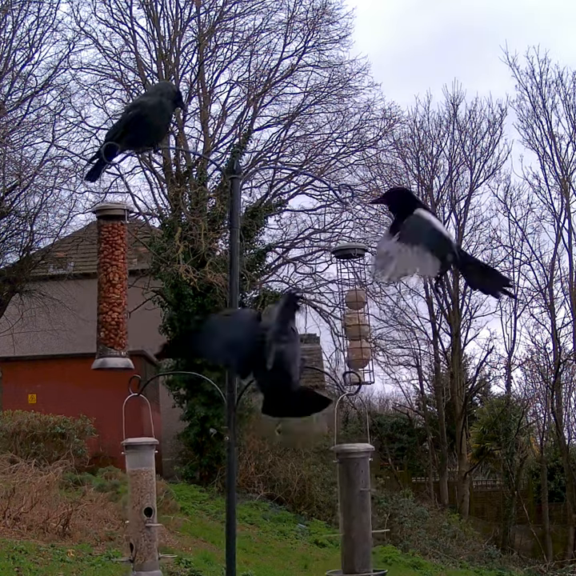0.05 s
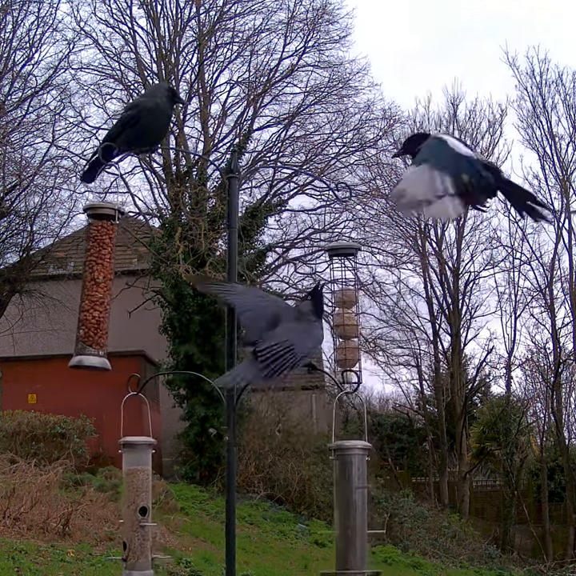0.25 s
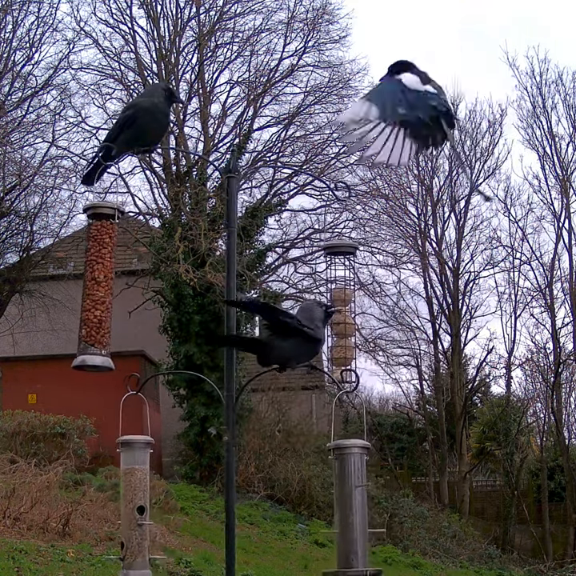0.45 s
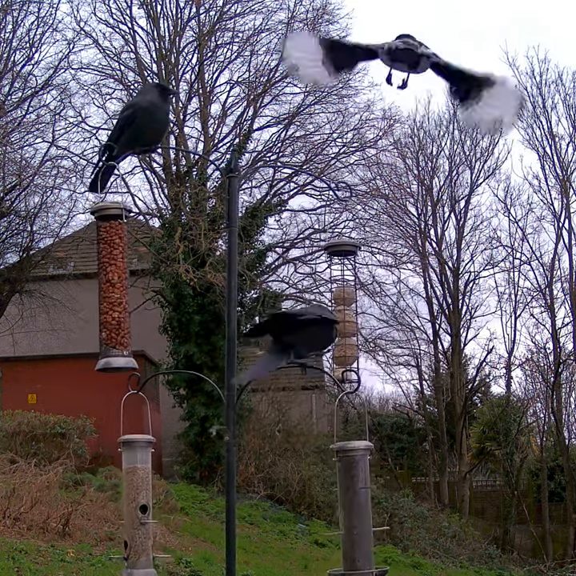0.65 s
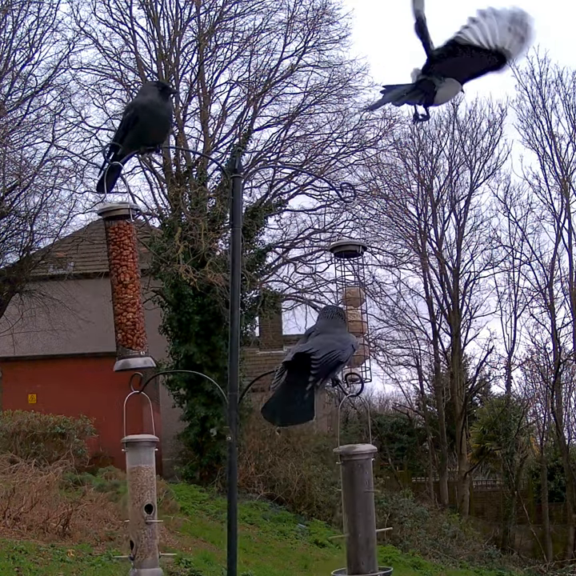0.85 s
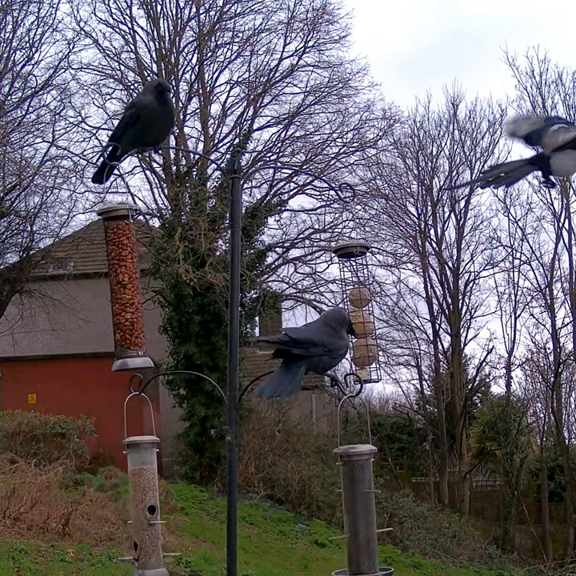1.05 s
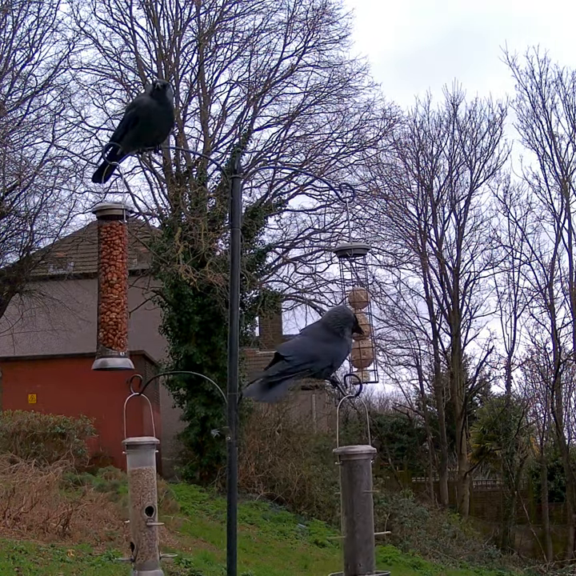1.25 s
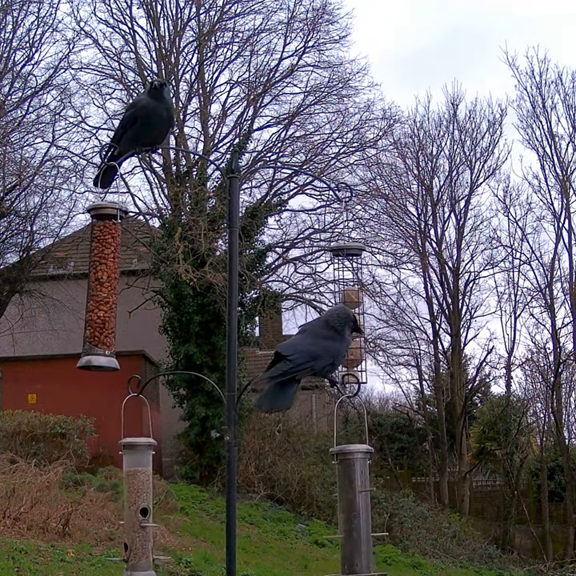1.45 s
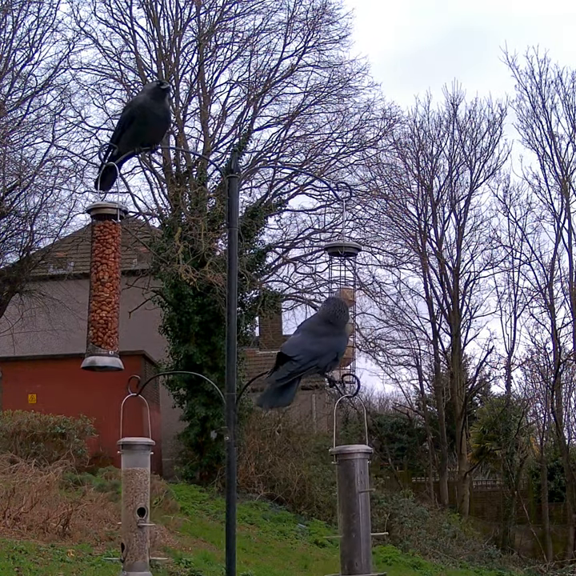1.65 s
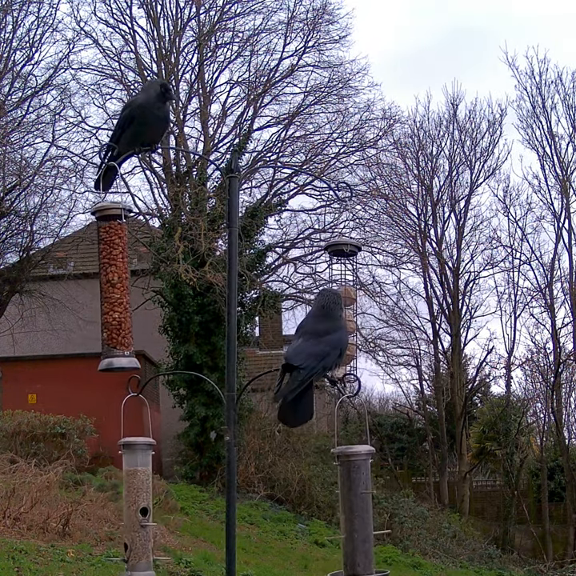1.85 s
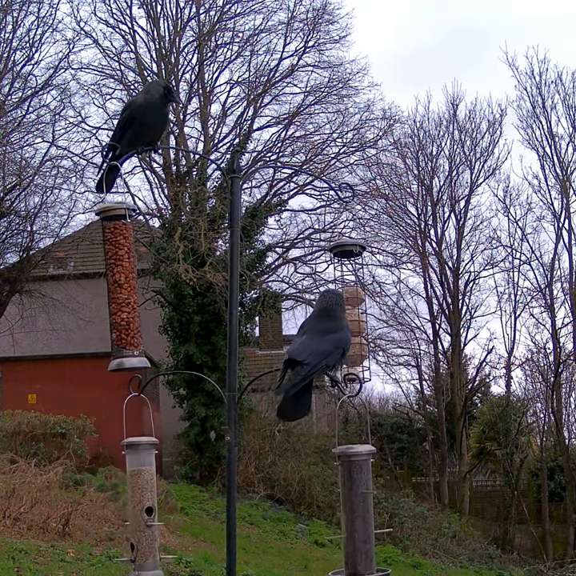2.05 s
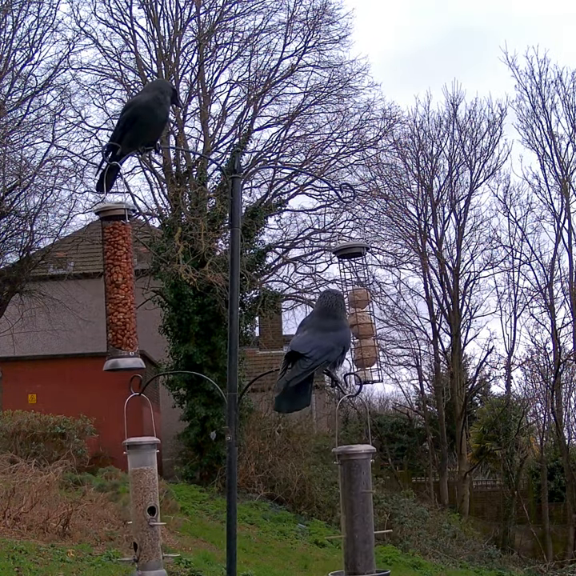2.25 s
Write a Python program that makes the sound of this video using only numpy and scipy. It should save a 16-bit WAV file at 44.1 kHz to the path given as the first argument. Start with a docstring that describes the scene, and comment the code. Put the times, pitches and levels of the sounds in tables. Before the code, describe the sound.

A jackdaw gives one sharp chack, then another half a second later; feather swishes, flaps and tiny snaps follow and fade, over soft distant traffic, leaf hiss and wind nudging a small outdoor camera microphone.

```python
"""Jackdaws at the garden feeder

Two sharp falling jackdaw calls, built from gliding harmonics, come back off nearby walls and the garden.
Shaped noise makes wing swishes, flaps, snaps, low body under the calls and two narrow resonances; gliding
sines make small songbirds trilling and peeping further off. Coloured noise gives far traffic hum, leaf hiss
and wind nudging the microphone of a small camera that samples at 16 kHz and loses its treble around sudden
loud sounds.
"""
import sys
import numpy as np
from scipy import signal
from scipy.fft import rfft, irfft, next_fast_len
from scipy.io import wavfile
from scipy.ndimage import uniform_filter1d, map_coordinates

SR = 44100
rng = np.random.default_rng(int(sys.argv[2]) if len(sys.argv) > 2 else 0)


def file_out(sig):
    """Save sig as 16-bit WAV at sys.argv[1]."""
    # one column per channel
    cols = np.atleast_2d(sig).T
    # limit, then scale
    lim = np.clip(cols, -1, 1)
    pcm = np.round(lim * 32767).astype(np.int16)
    wavfile.write(sys.argv[1], SR, pcm)


def volts(x):
    """Linear amplitude factor 10**(x/20) for a level x in dB, scalar or array-like."""
    e = np.asarray(x, float) / 20
    return 10 ** e


N = 101429  # length in samples, 2.3 s


def unit(x):
    """Scale to rms 1."""
    return x / np.sqrt(np.mean(x ** 2) + 1e-20)


def along(points, hz):
    """Read a curve of (Hz, value) points on a log frequency axis."""
    point_hz, value = np.transpose(points)
    return np.interp(np.log(hz + 1), np.log(point_hz + 1), value)


def curves(rows):
    """One automation curve, a value per sample, for each column after the time."""
    time_s, *columns = np.transpose(rows)
    return [np.interp(np.arange(N) / SR, time_s, column) for column in columns]


def wobble(rate):
    """A smooth random curve with rate knots a second, 399 at most."""
    knots = rng.standard_normal(int(N * 400 / SR) + 4)
    return map_coordinates(knots, [np.arange(N) * min(rate, 399) / SR])


def filtered(x, response):
    """Filter x by a gain that is a function of frequency in Hz."""
    size = next_fast_len(N + 8192)
    gain = response(np.fft.rfftfreq(size, 1 / SR))
    return irfft(rfft(x, size) * gain, size)[:N]


def rush(spectrum, patchy_db):
    """Coloured noise of rms 1 whose gain varies in random patches of time and pitch."""
    cells = signal.stft(rng.standard_normal(N), nperseg=512)[2]
    patches = uniform_filter1d(rng.standard_normal(cells.shape), 5, 0)
    patches = uniform_filter1d(patches, 6, 1)
    noise = signal.istft(cells * volts(patchy_db * unit(patches)), nperseg=512)[1][:N]
    return unit(filtered(noise, lambda f: volts(along(spectrum, f))))


def closed(points):
    """Fade a spectrum to -90 dB beyond both ends."""
    return [(points[0][0] / 2, -90)] + list(points) + [(points[-1][0] * 1.15, -90)]


def puffs(rows, spectrum, patchy_db, flicker_db):
    """Noise puffs with soft bell-shaped envelopes and a ragged surface."""
    t = np.arange(N) / SR
    power = sum(volts(2 * db) * np.exp(-((t - centre) / width) ** 2) for centre, width, db in rows)
    return np.sqrt(power) * volts(flicker_db * wobble(200)) * rush(closed(spectrum), patchy_db)


# decay of the garden's scatter: freq_hz, t60_s
GARDEN_DECAY = [(500, .22), (2000, .25), (8000, .2)]


def garden(x):
    """Diffuse scatter from trees and houses: decaying noise of unit energy, convolved with the sound."""
    hz, t, cells = signal.stft(rng.standard_normal(SR // 2), SR, nperseg=256)
    decay_db = -60 * t / along(GARDEN_DECAY, hz)[:, None]
    tail = signal.istft(cells * volts(decay_db), SR, nperseg=256)[1]
    late = np.pad(x, (300, 0))  # pre-delay, samples
    return signal.fftconvolve(late, tail / np.linalg.norm(tail))[:N]


# levels of the garden air: time_s, hum_db, hiss_db, wind_db
AIR_LEVELS = [(0.0, -65, -70.5, -54.5), (0.15, -66, -76, -58.5), (0.29, -55.5, -63, -51.5),
              (0.38, -61.5, -75.5, -56.5), (0.56, -63.5, -70.5, -58.5), (0.79, -58.5, -69, -53.5),
              (0.93, -58.5, -71.5, -58.5), (1.09, -58, -69.5, -51.5), (1.23, -58.5, -69.5, -50.5),
              (1.47, -62.5, -71.5, -57.5), (1.96, -64.5, -77.5, -58), (2.3, -65.5, -75.5, -60)]
# far traffic hum, spectral density: freq_hz, density_db
HUM_SPECTRUM = [(76, -39), (130, -11.5), (217, -4), (320, -11), (362, -8), (377, -14.5), (502, -12.5),
                (668, -8.5), (966, -11.5), (1500, -31), (1950, -28), (3300, -120)]
# leaf hiss, spectral density: freq_hz, density_db
HISS_SPECTRUM = [(760, -5), (1300, -13.5), (1720, -5.5), (1950, -12), (2580, -4.5), (2800, -12.5),
                 (3730, -8.5), (5260, -9), (6690, -4.5), (7790, -11.5), (8780, -30), (11400, -56),
                 (19300, -120)]
# wind on the microphone, spectral density: freq_hz, density_db
WIND_SPECTRUM = [(8.8, -15), (15, -0.5), (65, -1.5), (100, -8.5), (124, -14), (150, -38.5), (200, -55),
                 (330, -120)]


def air():
    """Traffic hum, leaf hiss and lumpy wind: three coloured noises, each riding its own level curve."""
    hum_db, hiss_db, wind_db = curves(AIR_LEVELS)
    hum = volts(hum_db + 1.23 * wobble(13.76)) * rush(HUM_SPECTRUM, patchy_db=2.0)
    hiss = volts(hiss_db + 0.44 * wobble(22)) * rush(HISS_SPECTRUM, patchy_db=2.0)
    wind = volts(wind_db + 1.5 * wobble(8.85)) * rush(WIND_SPECTRUM, patchy_db=1.3)
    return hum + hiss + wind


# level of the sustained ring: time_s, level_db
RING_LEVEL = [(0.0, -78.5), (0.76, -97.5), (0.93, -69.5), (1.11, -80), (2.03, -85.5), (2.3, -106)]
# bursts of the same ring: centre_s, width_s, level_db
RING_BURSTS = [(.075, 0.014, -73), (.545, 0.021, -72), (.574, 0.0091, -57.5), (.797, 0.0028, -55),
               (.83, 0.01, -66), (.875, 0.018, -58), (.915, 0.019, -64), (.992, .006, -65),
               (1.02, .02, -67), (1.12, 0.013, -64.5), (1.975, .004, -73.5)]
# spectrum of the bursts: freq_hz, density_db
RING_SPECTRUM = [(3400, -22), (3700, -4.5), (3800, 8.5), (3950, -4.5), (4250, -30)]


def narrow_ring():
    """A narrow noise band near 3.8 kHz, sustained with a flickering level and stirred into short bursts."""
    centre_hz, width_hz, flicker_db = 3800, 180, 3.5
    noise = rng.standard_normal(N)
    band = unit(filtered(noise, lambda f: 1 / (1 + ((f - centre_hz) / width_hz) ** 4)))
    sustained = volts(curves(RING_LEVEL)[0] + flicker_db * wobble(59.45)) * band
    return sustained + puffs(RING_BURSTS, RING_SPECTRUM, patchy_db=-0.5, flicker_db=3.0)


# trills: start_s, length_s, pitch_top_time_s, level_db, swell_db_per_s, top_pitch_hz, top_climb_hz_per_s,
# low_pitch_hz, sweeps_per_s
TRILL_NOTES = [(-.02, .058, .006, -52, -60, 3850, 0, 2600, 47),
               (-.02, .058, .0175, -53, -120, 2950, 0, 2180, 50),
               (2.226, .1, 2.2845, -59, 170, 3600, 3500, 2470, 64.5)]
# peeps: start_s, length_s, from_hz, to_hz, level_db
PEEP_NOTES = [(1.385, .07, 7950, 7350, -64), (1.545, .065, 7550, 6900, -73), (1.59, .025, 6300, 5700, -74),
              (1.875, .03, 6300, 5800, -76), (.432, .026, 3250, 2800, -69)]


def songbirds():
    """A whistle flung up and down, lingering low, a little unsteady; thin sliding peeps; garden scatter."""
    point, wet_db = 1.7, -9  # a higher point makes the pitch tops narrower
    t, out = np.arange(N) / SR, np.zeros(N)
    for start, length, top, db, swell, high_hz, climb, low_hz, rate in TRILL_NOTES:
        age = np.clip(t - start, 0, length)
        lift = np.abs(np.cos(np.pi * rate * (t - top))) ** (2 * point)  # 0 low, 1 at a pitch top
        low = low_hz + .3 * climb * (age - length / 2)
        pitch = low + (high_hz + climb * age - low) * lift + 60 * wobble(150)
        fade = np.clip(np.minimum(t - start, start + length - t) / 0.013, 0, 1)
        # weaker mid-sweep, stronger at the tops, but less so before the timed top
        weak_db = 28 * lift * (1 - lift) - 3 * lift + 480 * lift * np.clip(top - t, 0, 1)
        level_db = db + swell * age - weak_db + 2.2 * wobble(200)
        out += fade * volts(level_db) * np.sin(2 * np.pi * np.cumsum(pitch) / SR)
    for start, length, from_hz, to_hz, db in PEEP_NOTES:
        u = np.clip((t - start) / length, 0, 1)
        pitch = from_hz + (to_hz - from_hz) * u + 40 * wobble(170)
        env = volts(db + 2.5 * wobble(90)) * np.sin(np.pi * u)
        out += env * np.sin(2 * np.pi * np.cumsum(pitch) / SR)
    return out + volts(wet_db) * garden(out)


# short broad feather snaps: centre_s, width_s, level_db
SNAP_TIMES = [(.58, .003, -67), (.95, .004, -64), (1.113, .007, -69), (1.228, .005, -74),
              (1.255, .005, -67), (1.362, .005, -67), (1.475, .008, -73), (1.595, .006, -74),
              (1.82, .006, -78)]
# snap spectrum: freq_hz, density_db
SNAP_SPECTRUM = [(2000, -7), (3500, -19.5), (5000, -2.5), (6800, 2.5), (7800, 3.5), (8600, -16.5)]


def feather_snaps():
    """Feather snaps: very short broadband noise puffs with a strongly flickering level."""
    return puffs(SNAP_TIMES, SNAP_SPECTRUM, patchy_db=1, flicker_db=6)


# brief narrow bursts of a microphone resonance: centre_s, width_s, level_db
RESONANCE_BURSTS = [(.143, 0.0062, -63), (.381, 0.007, -64), (.505, .004, -52), (.573, 0.01, -64.5),
                    (.8115, .002, -55), (.823, .003, -62), (.893, 0.0089, -56.5), (.943, 0.0036, -61),
                    (1.008, 0.0062, -62), (1.038, 0.012, -61), (1.143, 0.0053, -71)]
# spectrum of the resonance: freq_hz, density_db
RESONANCE_SPECTRUM = [(5300, -36), (5750, -7), (6050, -2), (6400, -11.5), (6900, -24)]


def microphone_resonance():
    """Brief narrow noise bursts near 6 kHz, a microphone resonance stirred by the wings."""
    return puffs(RESONANCE_BURSTS, RESONANCE_SPECTRUM, patchy_db=-2.0, flicker_db=3.0)


# dull low puffs, wing flaps and low body under the two calls: centre_s, width_s, level_db
LOW_PUFF_TIMES = [(.165, 0.017, -67), (.275, 0.005, -63.5), (.765, 0.023, -49.5), (.46, 0.039, -65),
                  (.815, 0.016, -51), (.915, 0.024, -54.5), (1.015, 0.022, -58), (1.11, 0.0087, -53),
                  (1.22, 0.0085, -89), (1.33, 0.037, -71), (1.41, 0.012, -64.5)]
# spectrum of the low puffs: freq_hz, density_db
LOW_PUFF_SPECTRUM = [(120, -21), (250, -3), (450, -1.5), (700, 5), (1000, 4), (1300, -23), (2500, -15),
                     (4000, -26.5)]


def flaps_and_call_body():
    """Dull low noise puffs, strongest below about 1 kHz: wing flaps, and low body under the two calls."""
    return puffs(LOW_PUFF_TIMES, LOW_PUFF_SPECTRUM, patchy_db=-1.0, flicker_db=3.0)


# feather swishes: centre_s, width_s, level_db
SWISH_TIMES = [(.38, 0.014, -72.5), (.51, 0.015, -51.5), (.812, 0.018, -55.5), (.845, 0.024, -60),
               (.893, 0.035, -60.5), (.947, 0.013, -56.5), (1.01, 0.017, -59), (1.042, 0.018, -56),
               (1.145, .014, -53.5)]
# swish spectrum: freq_hz, density_db
FEATHER_SPECTRUM = [(1200, -39), (2500, -23), (3800, -16), (4800, -11.5), (5500, -14), (6000, -0.5),
                    (6500, -12), (7000, -3), (7800, -14), (8600, 9)]


def feather_swishes():
    """Feather swishes: bright turbulent noise puffs, as birds shuffle places."""
    return puffs(SWISH_TIMES, FEATHER_SPECTRUM, patchy_db=3, flicker_db=2.5)


# jackdaw calls: start_s, length_s, start_pitch_hz, end_pitch_hz, level_db, sag_over_call_db
JACKDAW_CALLS = [(.2222, .032, 1135, 910, -33, 0), (.733, .0215, 1060, 930, -34, 4.5)]
# breathy rasp, spectral density: freq_hz, density_db
HOARSE_SPECTRUM = [(700, -9), (1500, -9.5), (2300, -19), (4000, -16), (5200, -3.5), (6800, -7), (8000, -30)]
# resonances of throat and beak: freq_hz, gain_db
THROAT_GAIN = [(700, 8.5), (950, 0), (1130, -6), (1750, -1), (1950, -8), (2080, -8), (2200, 6),
               (2700, -4.5), (3100, -3), (3500, -13.5), (3800, -2), (4400, -14.5), (5000, -15),
               (6000, -17.5), (7000, -13), (8000, -65)]
# wall echoes: delay_s, gain_db, dull_above_hz
WALL_ECHOES = [(.024, -9, 1186), (0.04, -38, 3880), (.135, -44, 3000)]


def jackdaws():
    """A harmonic stack slides down through the throat, overtones rasping, end turning hoarse; walls repeat it."""
    attack_s, release_s, trail_s, trail_db = .0035, .0025, 0.013, -9
    bend, phase_spread, rasp, jitter = 1.3, 1.3, .55, .05  # glide exponent, then three phase depths in rad
    hoarse_db, garden_db = -16, -13
    t, out = np.arange(N) / SR, np.zeros(N)
    for start, length, from_hz, to_hz, db, sag_db in JACKDAW_CALLS:
        u = np.clip((t - start) / length, 0, 1.7)  # the glide runs on into the trail
        pitch = from_hz + (to_hz - from_hz) * u ** bend
        phase = 2 * np.pi * np.cumsum(pitch) / SR
        after = np.clip(t - start - length, 0, 1)
        stop = np.exp(-after / release_s)
        trail = volts(trail_db) * np.exp(-after / trail_s) * (1 - stop)
        env = np.clip((t - start) / attack_s, 0, 1) * (stop + trail)
        shake = wobble(300)  # shared by all harmonics
        voice = np.zeros(N)
        for k in range(1, 10):
            roughness = rasp * (k > 4) * wobble(360)  # upper overtones only
            angle = k * phase + phase_spread * k * k + roughness + jitter * k * shake
            voice += volts(along(THROAT_GAIN, k * pitch)) * np.cos(angle)
        breath = rush(closed(HOARSE_SPECTRUM), patchy_db=2) * (1 + np.cos(phase))  # pulses at the pitch
        hoarse = volts(hoarse_db) * u * breath
        call = volts(db - sag_db * u) * env * (voice + hoarse)
        out += call + volts(garden_db) * garden(call)
        for delay, gain_db, dull_hz in WALL_ECHOES:
            late = np.roll(call, round(delay * SR))
            out += volts(gain_db) * filtered(late, lambda f: 1 / (1 + (f / dull_hz) ** 4))
    return out


def scene():
    """All sources summed, mono."""
    background = air() + narrow_ring() + songbirds()
    bustle = feather_snaps() + microphone_resonance() + flaps_and_call_body() + feather_swishes()
    return (background + bustle + jackdaws())[None]


def roll_off(x):
    """The treble ends steeply here."""
    return signal.sosfilt(signal.butter(12, 8930, fs=SR, output="sos"), x)


def record(dry):
    """Treble drops out around sudden loud onsets; the top mirrors above half the 16 kHz sample rate."""
    sample_hz, split_hz, image_db = 16000, 4650, -4
    jump_db, lost_before_s, lost_after_s, ramp_s = 14, .042, .027, .006
    x, t = dry[0], np.arange(N) / SR
    half_hz = sample_hz / 2

    # onsets: a steep rise within 10 ms, close to the loudest level
    middle = filtered(x, lambda f: (f > 800) & (f < 3500))
    level = 10 * np.log10(np.abs(uniform_filter1d(middle ** 2, 220)) + 1e-12)
    jump = (level - np.roll(level, 440) > jump_db) & (level > level.max() - 14) & (t > .05)
    starts = t[1:][jump[1:] & ~jump[:-1]]
    onsets = [s for k, s in enumerate(starts) if k == 0 or s - starts[k - 1] > .1]
    lost = sum(np.clip(np.minimum(t - s + lost_before_s, s + lost_after_s - t) / ramp_s, 0, 1)
               for s in onsets)

    base = filtered(x, lambda f: f < half_hz)
    folded = 2 * base * np.cos(2 * np.pi * sample_hz * t)

    def image_gain(f):
        """Pass only the mirror image, falling steeply above half the sample rate."""
        fall_db = 60 * np.abs(f / half_hz - 1) ** 1.433 * 8.6
        return (f >= half_hz) * volts(image_db - fall_db)

    full = base + filtered(folded, image_gain)
    treble = filtered(full, lambda f: f > split_hz)
    mix = full - treble * lost
    return roll_off(mix[None])


dry = scene()
out = record(dry)
file_out(out)
```